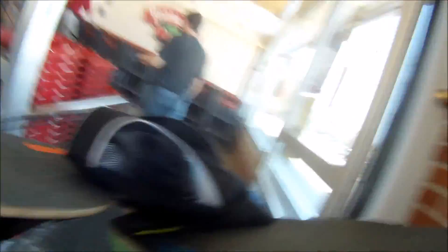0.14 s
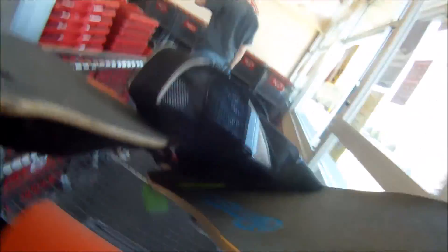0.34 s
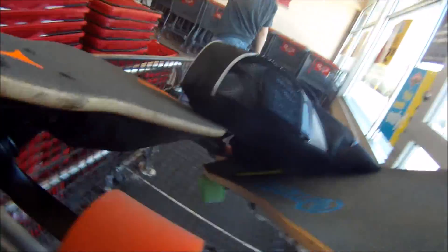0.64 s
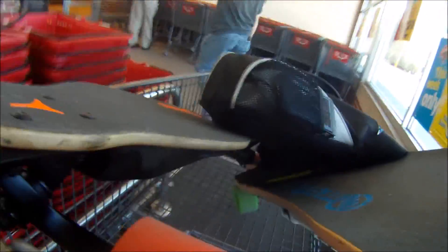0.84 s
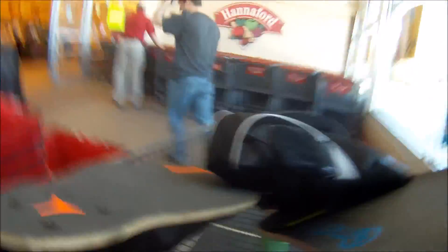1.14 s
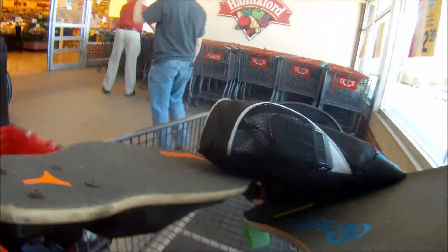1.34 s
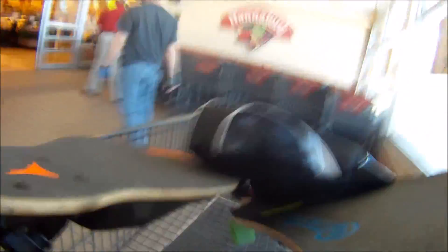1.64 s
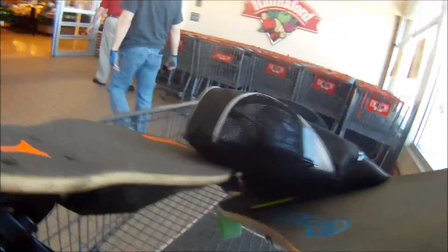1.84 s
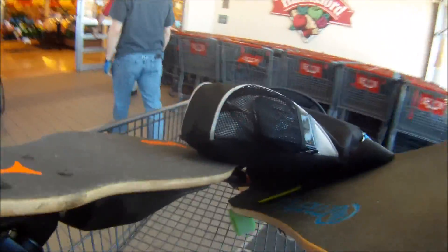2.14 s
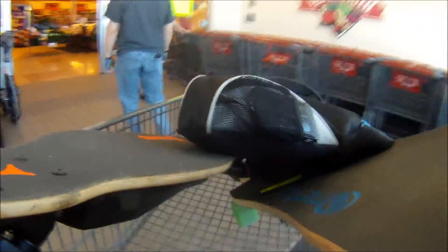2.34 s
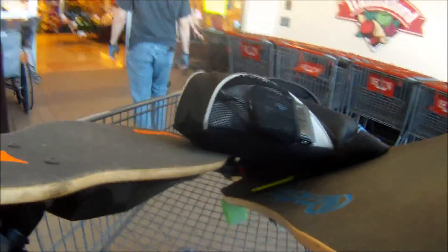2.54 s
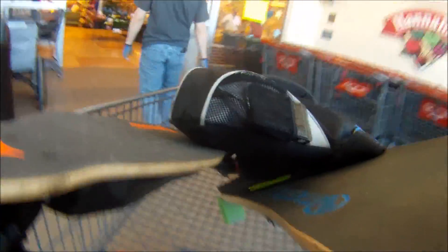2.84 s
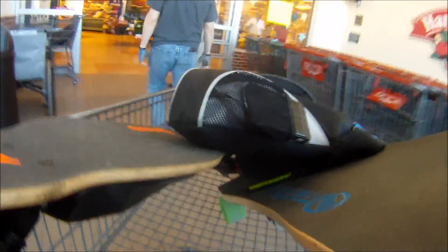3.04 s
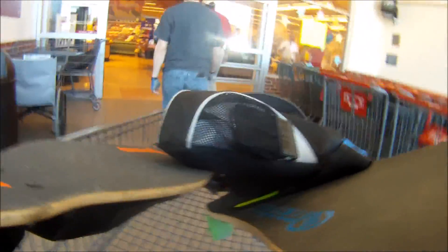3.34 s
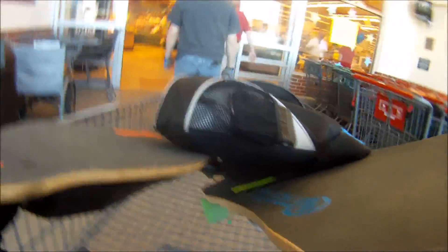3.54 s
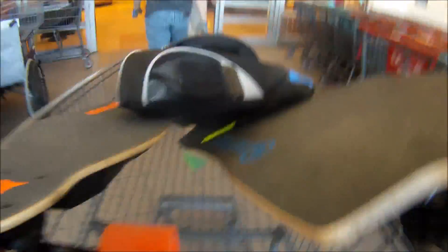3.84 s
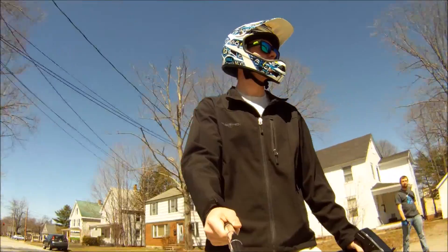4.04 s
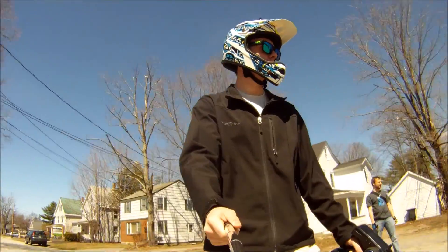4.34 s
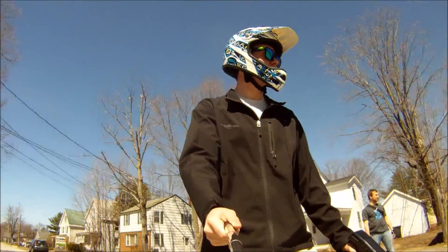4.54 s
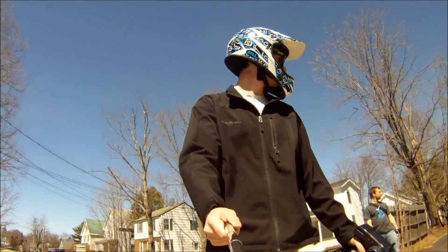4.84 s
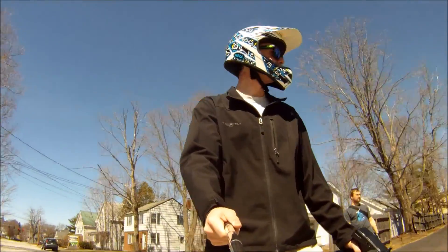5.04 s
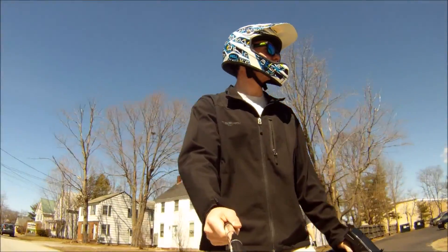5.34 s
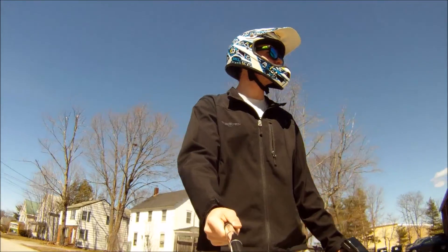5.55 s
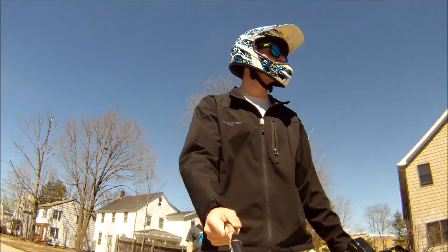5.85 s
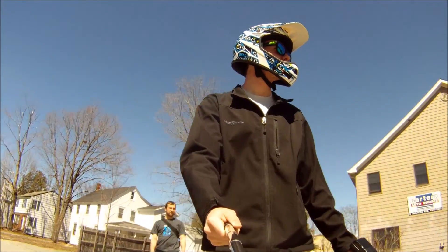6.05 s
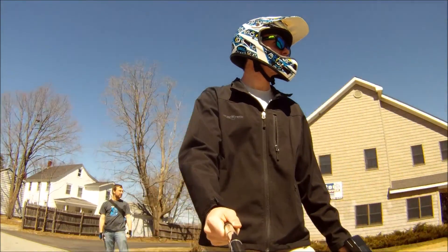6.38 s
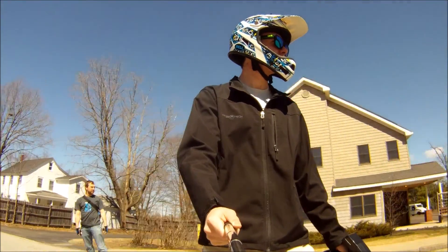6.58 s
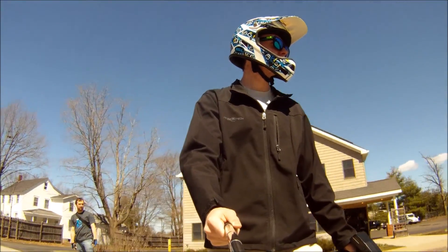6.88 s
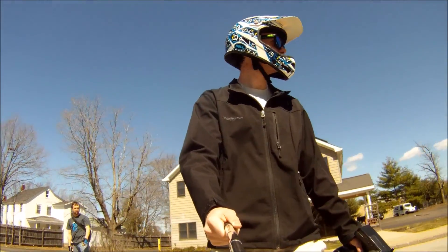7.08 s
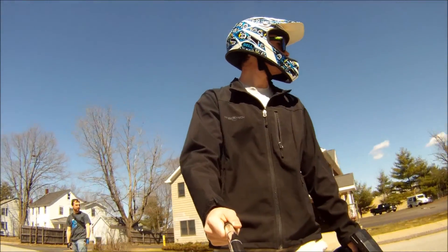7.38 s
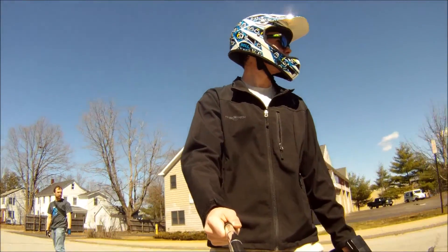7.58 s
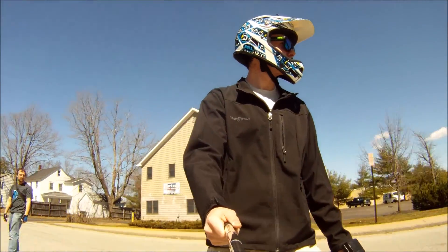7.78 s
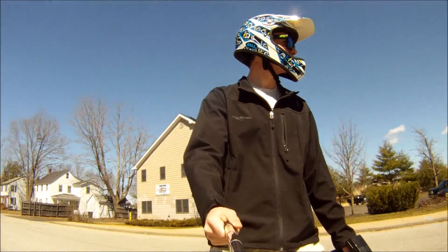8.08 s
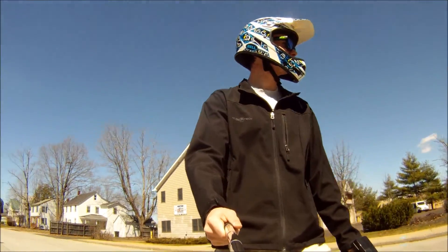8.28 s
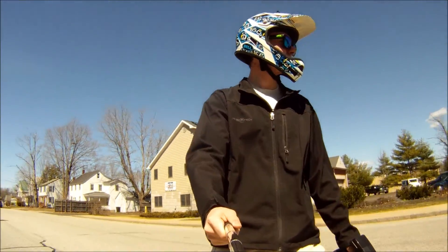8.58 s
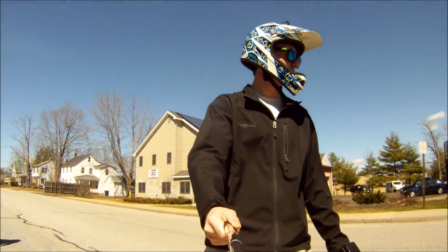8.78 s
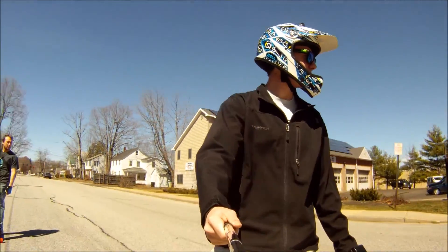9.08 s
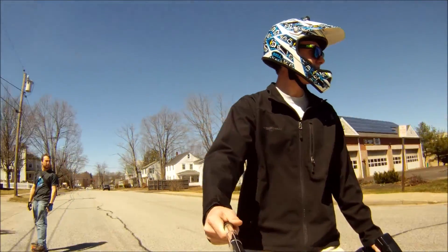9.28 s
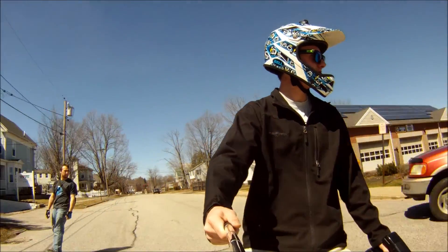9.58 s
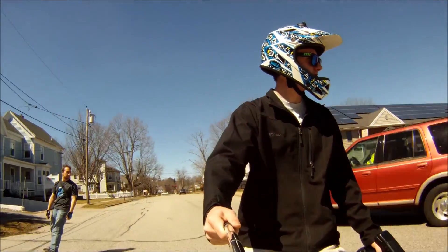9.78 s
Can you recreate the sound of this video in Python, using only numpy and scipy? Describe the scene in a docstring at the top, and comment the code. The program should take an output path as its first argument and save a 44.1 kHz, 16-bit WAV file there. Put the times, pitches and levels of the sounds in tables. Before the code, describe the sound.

A wire shopping cart rattles and knocks loudly across a shop entrance, then cuts abruptly to an electric longboard's softer rolling roar, wind and faint whine.

```python
"""A camera in a hard case rides in a wire shopping cart across a shop entrance: resonant noise booms, grains
buzz and tick through the case modes, and knocks ring them as decaying sines over the air of the hall.
Then, after a cut, a rider on an electric longboard holds it: noise filtered by the case walls roars and
hisses as wheels on asphalt, a wavering tone drones, wind rumbles and gliding tones whine as the motor."""
import sys
import numpy as np
from scipy import signal
from scipy.fft import rfft, irfft, next_fast_len
from scipy.io import wavfile
from scipy.ndimage import map_coordinates

SR = 44100
rng = np.random.default_rng(int(sys.argv[2]) if len(sys.argv) > 2 else 0)


def file_out(sig):
    """Save sig as 16-bit WAV at sys.argv[1]."""
    # one column per channel
    cols = np.atleast_2d(sig).T
    # limit, then scale
    lim = np.clip(cols, -1, 1)
    pcm = np.round(lim * 32767).astype(np.int16)
    wavfile.write(sys.argv[1], SR, pcm)


N = 437472
CUT_S = 3.992
# share of the rough floor's extra chatter dB that reaches the basket
ROUGH_BOOM_SHARE = 0.43
# modes of the hard case: (frequency [Hz], relative level [dB], t60 [s])
CASE_MODES = [(780, -6, .015), (1010, 1, .021), (1220, -10, .012), (1480, -6, .014), (1730, -1.5, .019),
              (2230, -2.5, .02), (2450, -2.5, .021), (2800, -10, .025), (3050, -15, .022),
              (3650, -14, .016), (4700, -19, .01), (7190, -26, .02), (8300, -19, .018), (9200, -20, .025),
              (9530, -13, .018), (9780, -13, .018), (10300, -15, .018), (10980, -16, .02),
              (13020, -17, .02), (13720, -17, .018), (14200, -17, .018), (14470, -16, .02),
              (14900, -22, .016)]
# shaking of the rolling cart: (time [s], relative basket boom [dB], frame sway [dB])
CART_SHAKE = [(0, -29, -28.5), (.14, -19, -23.5), (.25, -55, -43), (.35, -19, -33), (.42, -36, -30.5),
              (.55, -29.5, -24), (.9, -30.5, -29), (1.02, -23, -17), (1.4, -27, -28.5), (1.68, -27.5, -25),
              (1.82, -19.5, -20), (2.1, -29, -22), (2.5, -24, -16.5), (2.58, -28.5, -34.5),
              (2.72, -27.5, -17.5), (3.0, -27, -30.5), (3.25, -28.5, -20.5), (3.5, -24, -22.5),
              (3.78, -28, -23), (3.9, -54, -49.5)]
# colour of the hall's air: (frequency [Hz], relative density [dB per Hz])
HALL_COLOUR = [(100, -18), (300, -3), (600, -6), (1000, 0), (1300, -3.5), (2250, 10), (2750, -1.5),
               (3600, 1), (4100, -8), (5100, -4), (6000, -15), (7200, -6.5), (7700, -12.5), (9000, -7.5),
               (9750, -4), (10700, -20), (12500, -35), (14300, -4.5), (15300, -23), (16000, -74)]


def amp(db):
    """Decibels to gain."""
    return 10 ** (np.asarray(db) / 20)


def unit(x):
    """Scale to rms 1."""
    return x / np.sqrt(np.mean(x ** 2) + 1e-20)


def along(points, hz):
    """Gain of (Hz, dB) points on a log-frequency axis."""
    f, v = np.transpose(points)
    return amp(np.interp(np.log(hz + 1), np.log(f + 1), v))


def curves(rows):
    """One value per sample for each column after the time."""
    s, *cols = np.transpose(rows)
    return [np.interp(np.arange(N) / SR, s, c) for c in cols]


def wobble(knots_per_s):
    """Smooth curve through random knots."""
    count = int(N * knots_per_s / SR) + 4
    return map_coordinates(rng.standard_normal(count), [np.arange(N) * knots_per_s / SR])


def filtered(x, response):
    """Multiply the spectrum of x by a response of frequency."""
    m = next_fast_len(N + SR // 2)
    return irfft(rfft(x, m) * response(np.fft.rfftfreq(m, 1 / SR)), m)[:N]


def noise(response):
    """Coloured noise of rms 1."""
    return unit(filtered(rng.standard_normal(N), response))


def resonant(modes, f):
    """Causal response of (Hz, width Hz, dB) resonances with alternating signs."""
    return sum((-1) ** k * amp(db) * 1j * f * w / (c * c - f * f + 1j * f * w)
               for k, (c, w, db) in enumerate(modes))


def shaken(modes):
    """Noise of rms 1 inside steep (Hz, width Hz, dB) resonances."""
    def response(f):
        powers = [abs(resonant([(hz, width, 0)], f) ** 2 * amp(db)) ** 2 for hz, width, db in modes]
        return np.sqrt(sum(powers))
    return noise(response)


def tone(hz):
    """A sine of rms 1 on a pitch curve."""
    return np.sqrt(2) * np.sin(2 * np.pi * np.cumsum(hz) / SR)


def grains(rate_hz, spread_db):
    """Random tiny impacts of uneven size and either sign, rms 1."""
    hits = rng.random(N) < rate_hz / SR
    return unit(hits * rng.choice([-1, 1], N) * amp(spread_db * rng.standard_normal(N)))


def add(track, s, sound):
    """Mix a sound in at time s."""
    part = track[round(s * SR):][:len(sound)]
    part += sound[:len(part)]


def case(f):
    """Response of the camera case to a contact: its modes, widths set by their t60."""
    return resonant([(hz, np.log(1000) / np.pi / t60, db) for hz, db, t60 in CASE_MODES], f)


def knocks(attack_s=0.00078, scatter_db=1.47, pitch_scatter_hz=25, level_db=-1, crack_db=-21, crack_t60=.014,
           thud_hz=300, thud_t60=0.008, treble_share=0.41, treble_db=1,
           scrape_db=7, scrape_t60=0.024, graze_db=-12.5):
    """Basket wire strikes the case: it grazes, rings the modes, scrapes, cracks and thuds; hardness adds treble."""
    # blows on the case: (time [s], relative level [dB], hardness as treble lift [dB], thud [dB])
    blows = [(0.1061, -25.5, -0.5, 8), (0.3391, -17.5, -1.5, -3), (0.3727, -8, -22, -1.5),
             (0.4077, -22, -1, 2), (1.034, -34, -2, 12), (1.0943, -24, 3.5, 12), (1.1362, -28, -8, 4),
             (1.208, -16.5, -5, 4), (1.2386, -30.5, -23, 0), (1.467, -20.5, -21, 3.5), (1.512, -23, -5, -4),
             (1.7263, -24, -1, 1), (1.785, -27, -8, -6), (1.8092, -11, -3, 3), (1.8407, -18.5, -4.5, 6),
             (1.9393, -18.5, -1.5, -1), (1.9484, -22.5, -10, 11), (1.955, -19, -0.5, 14.5),
             (2.1253, -30.5, -10, 5), (2.256, -19.5, 2, 2), (2.332, -37.5, -17, 5), (2.4286, -33.5, -7, 13),
             (2.4952, -15.5, 0, 6.5), (2.529, -9, 0, 13), (2.665, -25, -2.5, 2), (2.7494, -23, 0, 6),
             (2.943, -28.5, -21, 2), (2.9882, -22, -0.5, 3), (3.2218, -27.5, 0.5, 12),
             (3.2913, -35, -6, 10), (3.307, -28.5, -5.5, 16), (3.399, -21.5, -2.5, 6),
             (3.4536, -32, -7, 17), (3.5534, -28, -31, 0), (3.578, -21.5, 0.5, 5), (3.7488, -38.5, -6, 0)]
    out, t = np.zeros(N), np.arange(SR // 10) / SR
    hz, mode_db, t60 = np.transpose(CASE_MODES)[:, :, None]
    low = hz[:, 0] < 2000
    reach = (hz > 2000) * np.where(hz > 6000, treble_share, 1)
    rise = 1 - np.exp(-(t / attack_s) ** 2)
    first, lead = SR // 100, SR // 160
    rub_colour = [(400, 0.5), (1100, 5.5), (1800, 8.0), (2400, 5.5), (4200, -2.0), (6000, -2.5),
                  (10000, -0.5), (15000, -4)]
    rub = noise(lambda f: abs(case(f)) ** 0.67 * along(rub_colour, f))
    for s, db, hard_db, thud_db in blows:
        scatter = scatter_db * rng.standard_normal(hz.shape)
        size = amp(mode_db + reach * (hard_db + treble_db) + scatter)
        pitch = hz + pitch_scatter_hz * rng.standard_normal(hz.shape)
        swing = np.sin(2 * np.pi * (pitch * t + rng.random(hz.shape)))
        modes = size * amp(-60 * t / t60) * rise * swing
        # level set by the low modes' first 10 ms
        ring = modes.sum(0) / np.std(modes[low].sum(0)[:first])
        contact = rub[round(s * SR):][:len(t)]
        # the wire grazes the case just before it lands
        graze = np.sqrt(np.arange(lead) / lead) * contact[-lead:]
        add(out, s - lead / SR, amp(db + graze_db) * graze)
        scrape = amp(scrape_db + hard_db / 2 - 60 * t / scrape_t60) * rise * contact
        dull_noise = signal.lfilter([1], [1, -.9], rng.standard_normal(len(t)))
        crack = amp(crack_db - 60 * t / crack_t60) * rise * dull_noise
        thud = amp(thud_db - 60 * t / thud_t60) * np.sin(2 * np.pi * thud_hz * t)
        add(out, s, amp(db + level_db) * (ring + scrape + crack + thud))
    return out


def rough_floor(edge_s=0.062):
    """Extra chatter in dB and grit gain as the casters roll on and off the door sill and rough stretches."""
    # rough stretches: (start [s], end [s], extra chatter [dB], grit crunch [dB])
    stretches = [(0.07, 0.187, 8.5, -31), (0.65, 0.787, 16.5, -39.5), (2.677, 3.733, 12.5, -61)]
    t = np.arange(N) / SR
    on = np.array([np.clip(np.minimum(t - start, end - t) / edge_s + .5, 0, 1)
                   for start, end, _, _ in stretches])
    _, _, extra_db, grit_db = np.transpose(stretches)
    return extra_db @ on, amp(grit_db) @ on ** 2


def basket(boom_db=-1, shimmy_db=-1, jolt_hz=115, jolt_peak_s=0.0059, flank_db=-25):
    """Hard wheels on tiles shake the low resonances of basket and frame; a caster shimmies, floor joints jolt."""
    # basket resonances: (frequency [Hz], width [Hz], relative level [dB])
    basket_modes = [(103, 39, -2.5), (132, 26, 4), (160, 47, -9)]
    # sway of the frame on its casters: (frequency [Hz], width [Hz], relative level [dB])
    frame_modes = [(36.2, 15, 2), (61.3, 19.3, 0)]
    # drone of the shimmying caster: (time [s], mean frequency [Hz], relative level [dB])
    shimmy = [(.45, 110, -45), (.7, 109.9, -22.5), (.95, 106.1, -32), (1.18, 103.1, -21), (1.3, 101.8, -28),
              (1.38, 103.9, -16.5), (1.56, 106.2, -18.5), (1.66, 106, -29), (1.8, 104.9, -78)]
    # drops over floor joints: (time [s], level [dB])
    jolts = [(0.972, -7.5), (1.036, -23), (1.132, -12), (1.952, -5.5), (3.438, -10.5), (3.469, -2.5)]
    boom_level, sway_level = curves(CART_SHAKE)
    boom_level = boom_level + ROUGH_BOOM_SHARE * rough_floor()[0]
    flank_colour = [(100, 11), (200, -10.0), (330, -11.0), (500, 1.0), (700, -17), (1200, -30), (3000, -72)]
    flank = noise(lambda f: along(flank_colour, f))
    out = amp(boom_level + boom_db) * (shaken(basket_modes) + amp(flank_db) * flank)
    out += amp(sway_level) * shaken(frame_modes)
    hz, db = curves(shimmy)
    out += amp(db + shimmy_db + wobble(30.9)) * tone(hz + wobble(25.7))
    t = np.arange(SR // 10) / SR
    bump = np.sin(2 * np.pi * jolt_hz * t) * np.exp(-(t / jolt_peak_s - 1) ** 2 * 2)
    for s, db in jolts:
        add(out, s, -amp(db) * bump)
    return out


def chatter(level_db=-27, tick_db=-18.0, sing_db=-34, body_db=-5, grit_buzz_db=-4, grit_body_db=-2,
            damping=0.96, turn_s=.198, turn_at_s=2.775, turn_db=3):
    """Loose wires buzz, tick and sing as the basket shakes; rough floor adds caster-turn swells and grit crunch."""
    # thin high ringing: (frequency [Hz], width [Hz], relative level [dB])
    wire_modes = [(11890, 60, 0), (12135, 60, 0)]
    boom_level, _ = curves(CART_SHAKE)
    extra_db, crunch = rough_floor()
    # an uneven caster bears hardest once a turn
    turn = np.cos(2 * np.pi * (np.arange(N) / SR - turn_at_s) / turn_s)
    swell_db = turn_db * turn * extra_db / extra_db.max()
    soft = [(400, -3), (600, -11.0), (830, -5.0), (1100, 3.5), (1600, -17.0), (2400, -14.5), (4000, -39),
            (6000, -36), (10000, -20), (11000, -4), (12000, -20), (13000, -4), (14000, -20)]
    body_colour = [(120, -24), (220, 2), (350, -4.5), (520, -8.0), (740, -11.5), (1500, -41)]
    # wires that lie against the case damp and broaden its modes
    buzz = unit(filtered(grains(990, 2.5), lambda f: abs(case(f)) ** damping * along(soft, f)))
    body = unit(filtered(grains(760, 4), lambda f: along(body_colour, f)))
    ticks = unit(filtered(grains(35, 5.0), lambda f: case(f) * np.sqrt(along(soft, f))))
    grit = unit(filtered(grains(2500, 1.5), lambda f: along(HALL_COLOUR, f) / np.hypot(1, f / 9000)))
    rattle_db = boom_level + level_db + extra_db + swell_db + 1.9 * wobble(28.26)
    rattle = amp(rattle_db) * (buzz + amp(body_db) * body)
    singing = amp(sing_db + ROUGH_BOOM_SHARE * extra_db) * shaken(wire_modes)
    wires = amp(boom_level) * (amp(tick_db) * ticks + singing)
    crushed = unit(grit + amp(grit_buzz_db) * buzz + amp(grit_body_db) * body)
    return rattle + wires + crunch * crushed


def wheels(hiss_db=1, grit_db=-2, slap_hiss_db=-11, crack_t60=0.034):
    """Urethane wheels roar and hiss on the grain of the asphalt and slap over cracks."""
    # rolling: (time [s], roar level [dB], relative hiss level [dB])
    roll = [(4.2, -45.5, -47), (4.36, -43, -44), (4.6, -42, -45.5), (4.8, -44.5, -45.5), (5.25, -45, -47.5),
            (6, -46.5, -46), (6.4, -47, -48.5), (7.5, -45, -48.5), (8.15, -46.5, -51.5), (8.4, -46.5, -48),
            (8.65, -45, -50.5), (9.05, -45, -50), (9.35, -45.5, -47.5), (9.7, -42, -45), (9.9, -43, -48)]
    # cracks in the road: (time [s], level [dB])
    cracks = [(9.127, -31.5), (9.524, -46)]
    # roar through the case: (frequency [Hz], relative density [dB per Hz])
    roar_colour = [(100, -23), (240, -10.5), (330, -5), (410, 1.5), (500, 0.5), (630, -5), (850, -7.5),
                   (1050, -14), (1280, -15), (1420, -8), (1560, -13), (1720, -7.5), (1900, -14),
                   (2020, -47.5), (2600, -29), (5000, -66)]
    # hiss through the case: (frequency [Hz], relative density [dB per Hz])
    hiss_colour = [(1200, -26), (2100, -15.5), (2650, -10.5), (3000, -1), (3500, -0.5), (3720, -14),
                   (4600, -16), (5000, -16), (5600, -13.5), (6800, -22.5), (8200, -18.5), (9000, -33.5),
                   (10000, -19), (11200, -23.5), (15000, -21.5), (15800, -35)]
    # case walls under airborne sound: (frequency [Hz], width [Hz], lift [dB])
    wall_modes = [(3030, 250, 5), (4104, 390, 9), (4590, 250, 9), (5540, 550, 6.5), (6440, 130, 7),
                  (10900, 300, -12), (12400, 260, 10), (13420, 220, 1), (13900, 180, 13),
                  (15040, 410, 14.5)]
    roar_level, hiss_level = curves(roll)
    slaps, t = np.zeros(N), np.arange(SR // 5) / SR
    for s, db in cracks:
        add(slaps, s, amp(db - 60 * t / crack_t60))

    def walls(f):
        return amp(sum(db / (1 + (2 * (f - c) / w) ** 4) for c, w, db in wall_modes))

    # coarse and smooth patches of asphalt pass under the wheels
    road = rng.standard_normal(N) + amp(grit_db) * grains(970, 2)
    road *= amp(1.14 * wobble(45))
    roar = unit(filtered(road, lambda f: along(roar_colour, f)))
    hiss = unit(filtered(road, lambda f: along(hiss_colour, f) * walls(f)))
    roar_gain = amp(roar_level + 0.18 * wobble(25)) + slaps
    hiss_gain = amp(hiss_level + hiss_db) + amp(slap_hiss_db) * slaps
    return roar_gain * roar + hiss_gain * hiss


def deck(drone_db=-2, wind_db=4, waver_hz=5):
    """Board and camera pole drone as one wavering tone, under a low rumble of wind."""
    # drone: (time [s], relative level [dB], mean frequency [Hz])
    drone_curve = [(4.2, -63, 84), (4.5, -43, 84), (4.9, -38, 112), (5.25, -47, 108), (5.55, -43, 109),
                   (5.85, -47, 88), (6.2, -56, 88), (6.6, -52, 88), (6.85, -36, 88), (7.05, -48, 81),
                   (7.25, -39.5, 84), (7.5, -52, 89), (8.05, -40.5, 95), (8.4, -38, 97), (8.52, -47, 92),
                   (8.7, -35, 88), (9.15, -44, 90), (9.9, -51, 82)]
    # wind at the camera: (time [s], relative level [dB])
    breeze = [(4.2, -53.5), (4.5, -45.5), (5.3, -49.5), (6.4, -51), (8, -48.5), (8.3, -46.5), (9, -45.5),
              (9.19, -40), (9.35, -47.5), (9.9, -47)]
    # wind through the case: (frequency [Hz], relative density [dB per Hz])
    wind_colour = [(15, -9.5), (30, -13), (55, -0.5), (90, 0), (125, -8), (170, -8.5), (230, -25),
                   (400, -55)]
    drone_level, hz = curves(drone_curve)
    wind_level, = curves(breeze)
    drone = unit(amp(4.0 * wobble(30)) * tone(hz + waver_hz * wobble(35)))
    wind = noise(lambda f: along(wind_colour, f))
    return amp(drone_level + drone_db) * drone + amp(wind_level + wind_db) * wind


def motor(switch_hz=9025, cruise_speed_hz=1310, upper_db=-3, jitter_hz=14):
    """Rotation puts pairs of whining tones around the switching frequency; they spread with speed."""
    # motor speed, as a tone's distance from the switching frequency: (time [s], distance [Hz])
    speed = [(4, 1430), (4.5, 1210), (4.8, 1456), (5.05, 1423), (5.4, 1323), (5.7, 1300), (6, 1316),
             (6.75, 1315), (7.1, 1236), (7.45, 1307), (8.4, 1333), (8.8, 1280), (9.05, 1395)]
    # pairs: (offset at cruising speed [Hz], share of the speed swing [1], relative level [dB])
    pairs = [(1320, 0.91, -78.5), (1690, 0.49, -83.5), (3320, 0.6, -74), (3560, .55, -66)]
    # narrow resonances that lift gliding tones: (frequency [Hz], width [Hz], lift [dB])
    peaks = [(7785, 120, 16), (10265, 120, 15), (7280, 70, 11), (10770, 70, 9)]
    speed_hz, = curves(speed)
    flutter_hz = jitter_hz * wobble(60)

    def whine(hz):
        lift_db = sum(db / (1 + (2 * (hz - c) / w) ** 2) for c, w, db in peaks)
        return amp(lift_db) * tone(hz)

    out = np.zeros(N)
    for cruise_hz, share, db in pairs:
        offset_hz = cruise_hz + share * (speed_hz - cruise_speed_hz) + flutter_hz
        pair = whine(switch_hz - offset_hz) + amp(upper_db) * whine(switch_hz + offset_hz)
        out += amp(db + 3.5 * wobble(15)) * pair
    return out


def hall(level_db=7):
    """Ventilation in the entrance hall: coloured noise that rises and falls slowly."""
    # air of the hall: (time [s], relative level [dB])
    hall_level = [(0, -47.5), (1.3, -47.5), (1.72, -55.5), (1.93, -48.5), (2.3, -60), (2.8, -55),
                  (3.98, -56)]
    level, = curves(hall_level)
    return amp(level + level_db) * noise(lambda f: along(HALL_COLOUR, f))


def scene():
    """The cart in the shop, then the ride in the street."""
    shop = knocks() + basket() + chatter() + hall()
    street = wheels() + deck() + motor()
    return np.where(np.arange(N) / SR < CUT_S, shop, street)[None]


def record(dry, top_hz=15750):
    """The camera clips at full scale, then cuts steeply above its band limit."""
    clipped = np.clip(dry[0], -1, 1)
    return filtered(clipped, lambda f: 1 / (1 + (f / top_hz) ** 100))[None]


dry = scene()
out = record(dry)
file_out(out)
```